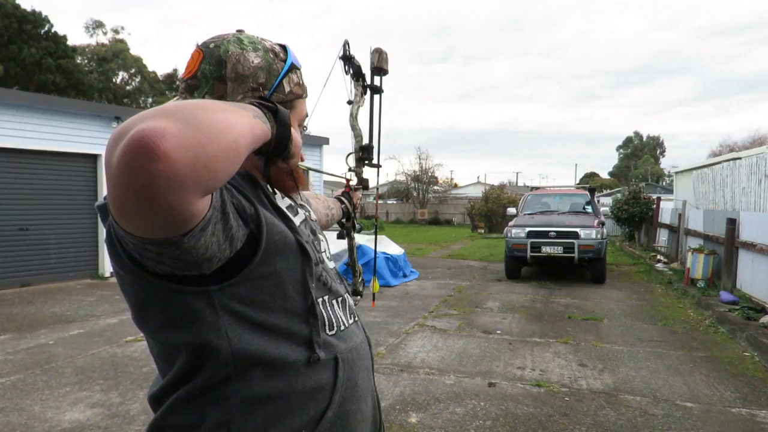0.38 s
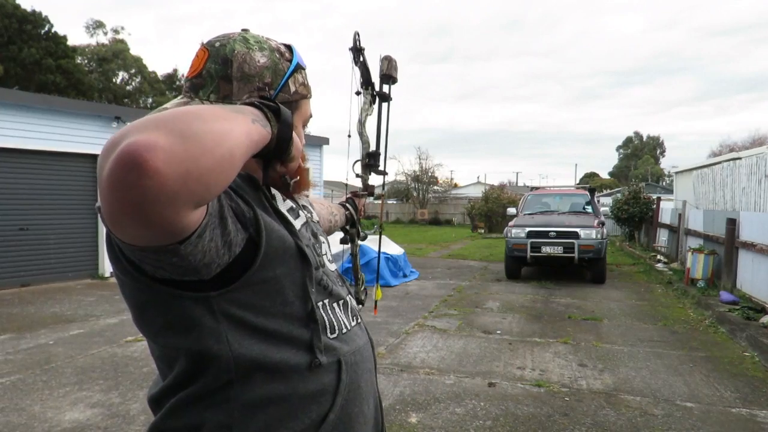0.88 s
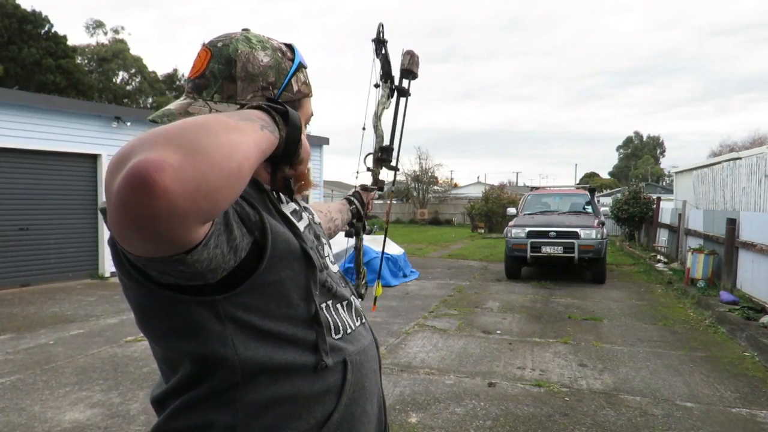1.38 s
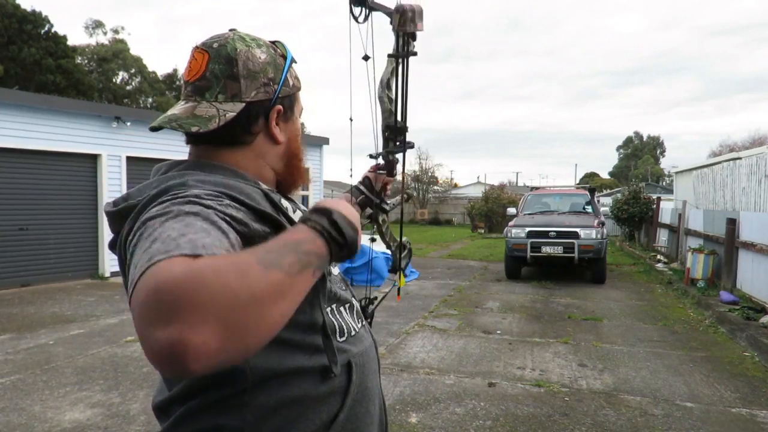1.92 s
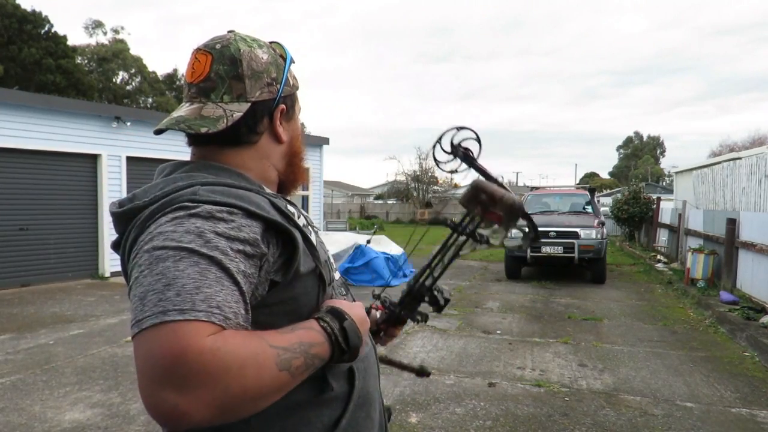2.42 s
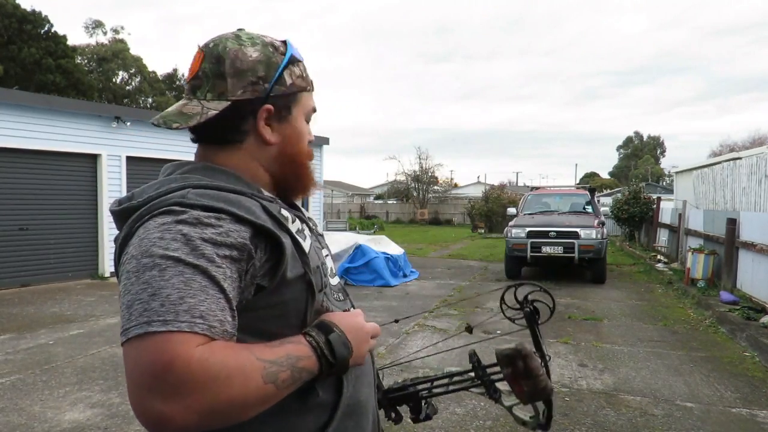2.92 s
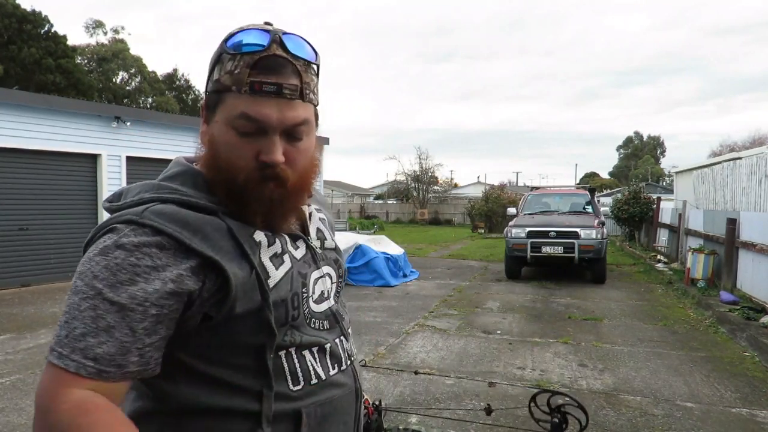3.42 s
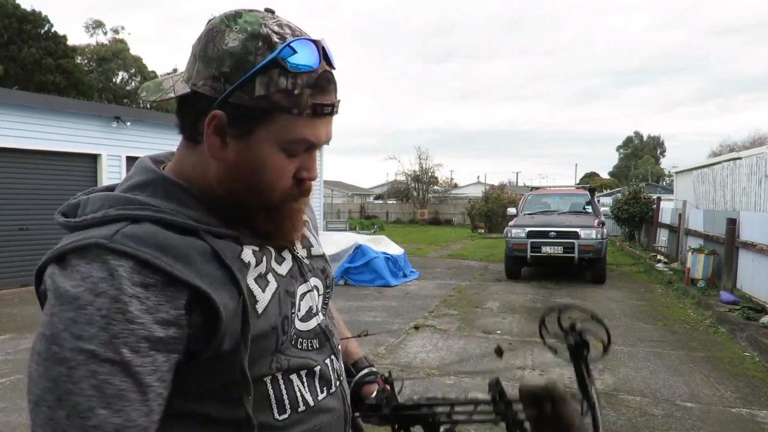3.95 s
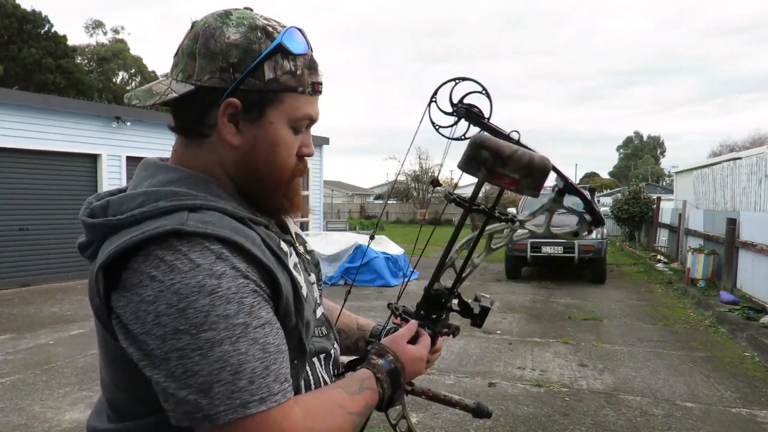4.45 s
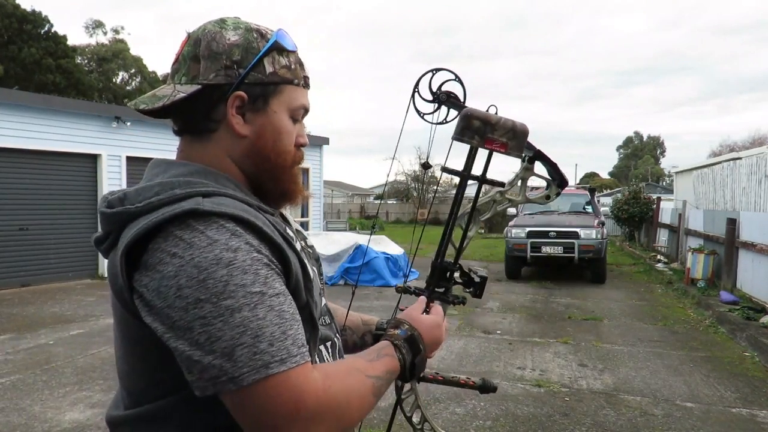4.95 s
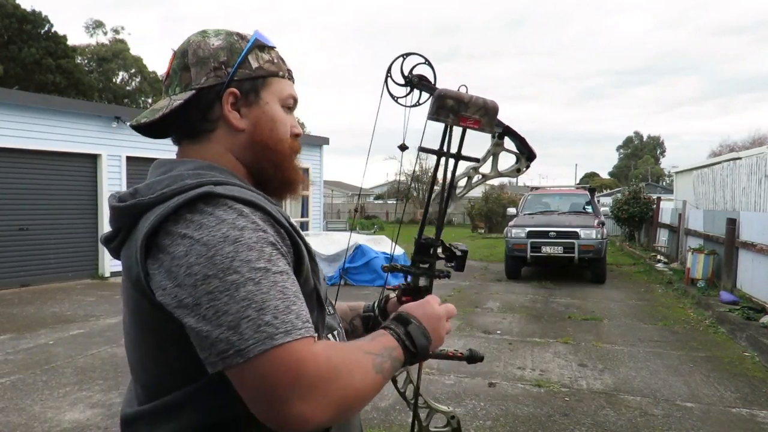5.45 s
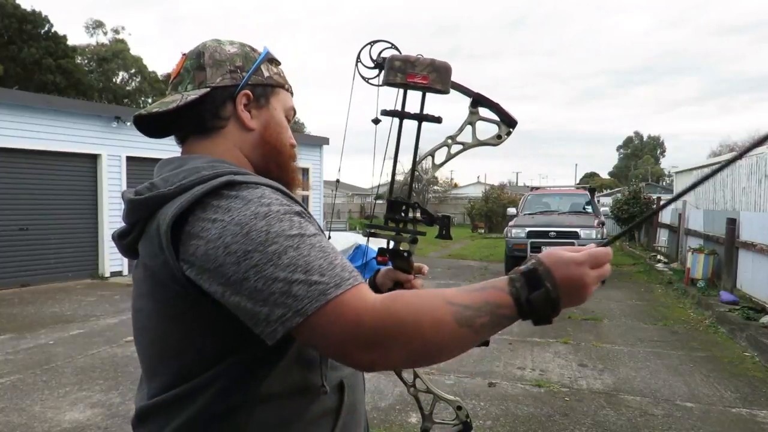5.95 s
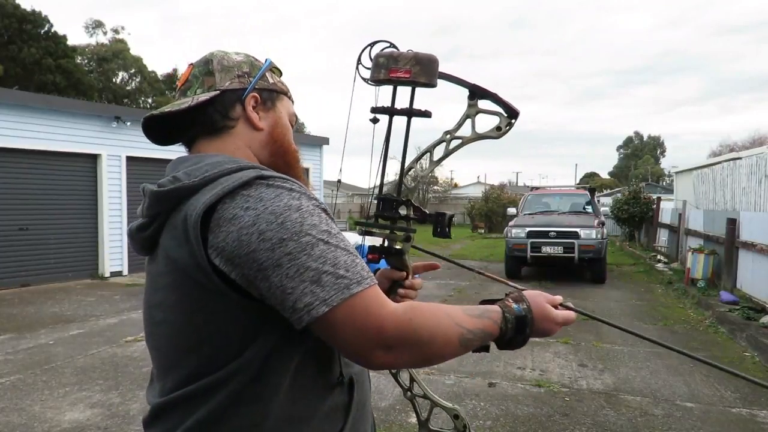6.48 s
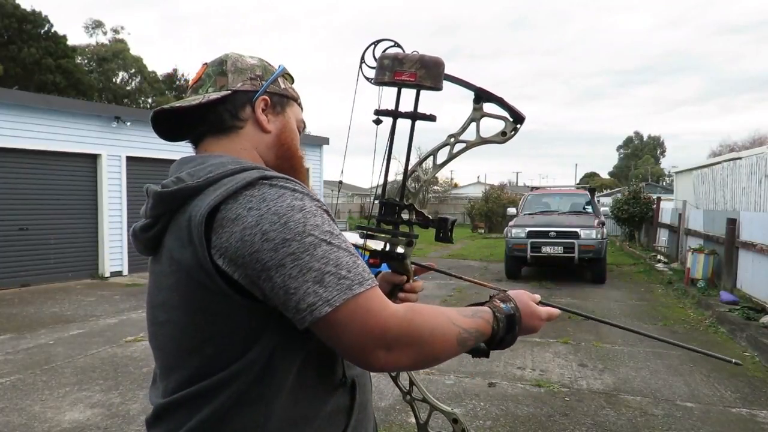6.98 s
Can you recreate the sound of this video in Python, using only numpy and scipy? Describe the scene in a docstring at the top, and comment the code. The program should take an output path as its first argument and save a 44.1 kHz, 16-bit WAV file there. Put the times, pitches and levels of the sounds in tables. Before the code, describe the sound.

Close up, a compound bow fires with a sharp clattering crack, the arrow thuds into a distant target, then light handling ticks over birds and traffic.

```python
"""A walled yard: close to a stereo recorder an arrow is loosed from a compound bow and thuds into a far target.
The archer handles the bow and snaps a new arrow out of the quiver; birds sing over distant traffic.
Blows are cracks, ringing modes and dying noise; hiss, rubs and traffic are shaped noise, birds gliding tones.
The walls scatter the sound back, and the recorder's gain control ducks after each loud blow."""
import sys
import numpy as np
from scipy import signal
from scipy.io import wavfile

SR = 44100
rng = np.random.default_rng(int(sys.argv[2]) if len(sys.argv) > 2 else 0)


def bounce(signal):
    """Save signal as a 16-bit WAV file at the path given by the first command-line argument."""
    frames = np.transpose(np.atleast_2d(signal))
    limited = np.clip(frames, -1, 1)
    pcm = np.round(limited * 32767).astype(np.int16)
    wavfile.write(sys.argv[1], SR, pcm)


def magnitude_from_level(level_db):
    """Linear magnitude for a level in decibels (20 dB per decade)."""
    exponent = np.asarray(level_db, float) / 20
    return 10 ** exponent


N = 313477   # length of the scene [samples]


def rms_one(x):
    """Scale to rms 1."""
    return x / np.sqrt(np.mean(x ** 2) + 1e-20)


def in_time(rows):
    """Columns of a curve over time, one value a sample."""
    s, *columns = np.transpose(rows)
    return [np.interp(np.arange(N) / SR, s, column) for column in columns]


def at_hz(points, hz):
    """Read a table over log frequency."""
    table_hz, values = np.transpose(points)
    return np.interp(np.log(hz), np.log(table_hz), values)


def drift(rate, size):
    """Slow random wander of spread 1, drawn every 40 samples; a higher rate wanders faster."""
    r = np.exp(-80 * np.pi * rate / SR)
    slow = signal.lfilter([1], [1, -2 * r, r * r], rng.standard_normal(size // 40 + 2002))
    settled = rms_one(slow)[2000:]
    return np.interp(np.arange(size) / 40, np.arange(len(settled)), settled)


def resonate(x, hz, width_hz):
    """A two-pole resonance of gain 1 on top."""
    r = np.exp(-np.pi * width_hz / SR)
    return signal.lfilter([(1 - r * r) / 2, 0, (r * r - 1) / 2],
                          [1, -2 * r * np.cos(2 * np.pi * hz / SR), r * r], x)


def add(out, x, s):
    """Mix x in from second s on."""
    at = round(s * SR)
    out[..., at:at + x.shape[-1]] += x[..., :N - at]


def span(from_s, to_s, edge_s):
    """1 between two moments, with soft edges."""
    t = np.arange(N) / SR
    return np.clip(np.minimum(t - from_s, to_s - t) / edge_s, 0, 1)


def bands(spectrum, likeness, size):
    """Half-octave bands of stereo noise: (centre Hz, sound), all together of rms about 1."""
    edges = 22 * 2 ** np.arange(0, 9.6, .5)
    centres = np.sqrt(edges[1:] * edges[:-1])
    gains = magnitude_from_level(at_hz(spectrum, centres))
    gains = gains / np.sqrt(np.sum(gains ** 2 * np.diff(edges)) * 4 / SR)
    white = rng.standard_normal((2, 2, size + 4000))   # neighbouring bands use different noise
    for k, hz in enumerate(centres):
        sos = signal.butter(2, edges[k:k + 2], "band", fs=SR, output="sos")
        mid, side = signal.sosfilt(sos, white[k % 2])[:, 4000:]
        alike = np.clip(at_hz(likeness, hz), -1, 1)
        stereo = np.sqrt(1 + alike) * mid + np.sqrt(1 - alike) * side * [[1], [-1]]
        yield hz, gains[k] * stereo


def glide(s, length_s, from_hz, to_hz, level_db, blur_hz, bend=1):
    """One gliding tone whose strength and phase waver, a little differently at each ear."""
    out, size = np.zeros((2, N)), int(length_s * SR)
    # a bend above 1 glides fast at first and levels off
    pitch_hz = to_hz * (from_hz / to_hz) ** np.linspace(1, 0, size) ** bend
    phase = 2 * np.pi * np.cumsum(pitch_hz) / SR
    paths = [drift(blur_hz, size) + 1j * drift(blur_hz, size) for _ in range(2)]
    paths = .3 + paths[0] + .5 * paths[1] * np.array([[1], [-1]])
    tone = np.real(paths * np.exp(1j * phase))
    add(out, magnitude_from_level(level_db) * signal.windows.tukey(size, .4) * tone, s)
    return out


def struck(jolts, modes, tail, tail_db, decay, rise_s):
    """Each jolt cracks and sets the modes ringing; dense small rattle and yard scatter die band by band."""
    # stereo image of the near blows: (frequency [Hz], left-right likeness [-1 to 1])
    near_likeness = [(60, 1), (240, 1), (950, 0.99), (3770, 0.86), (15000, 0.98)]
    # late scatter off walls and fence, against the first tail
    echo_db, echo_t60_s, dull_above_hz = -23, 1, 5000
    out, start, size = np.zeros((2, N)), jolts[0][0], int(.6 * SR)
    t = np.arange(size) / SR
    hz, mode_db, t60 = np.transpose(modes)[:, :, None]
    signs = (-1) ** np.arange(len(hz))[:, None]
    for s, ring_db, crack_db, crack_hz in jolts:
        strength = signs * magnitude_from_level(ring_db + mode_db + rng.normal(0, 1.6, hz.shape))
        ringing = strength * magnitude_from_level(-60 * t / t60) * np.sin(2 * np.pi * hz * t)
        add(out, np.sum(ringing, axis=0), s)
        impact = np.exp(-t / .00008) * (1 + 0.25 * rng.standard_normal(size))
        crack = resonate(impact, crack_hz, 0.54 * crack_hz)
        crack = resonate(crack, crack_hz, 1.2 * crack_hz)
        add(out, magnitude_from_level(crack_db) * crack / np.max(np.abs(crack)), s)
    late = magnitude_from_level(echo_db - 60 * t / echo_t60_s) * (1 - np.exp(-t / 0.033))
    fade_out = np.hanning(2 * size)[size:] ** .5
    for centre, noise in bands(tail, near_likeness, size):
        early = (1 - np.exp(-t / rise_s)) * magnitude_from_level(-60 * t / at_hz(decay, centre))
        scatter = late / (1 + (centre / dull_above_hz) ** 2)
        add(out, noise * magnitude_from_level(tail_db) * (early + scatter) * fade_out, start)
    rumble_cut = signal.butter(3, 95, "high", fs=SR, output="sos")
    return signal.sosfilt(rumble_cut, out + 1e-18)


def bow_jolt():
    """The stopping string jolts the bow: limbs and riser ring as damped modes over a noisy rattle."""
    # jolts as the string stops: (time [s], ring level [dB], crack peak [dB], crack centre [Hz])
    jolts = [(.6614, -30, -4.5, 4006), (.6632, -18, -17.5, 1525), (.6652, -10.5, -7, 1800),
             (.673, -11, -6.5, 2500), (.6765, -18.5, -10, 4020), (.685, -21, -10.5, 3000),
             (.6932, -22, -11, 2505)]
    # limbs and riser: (frequency [Hz], level [dB], time to fade 60 dB [s])
    modes = [(204, -1.5, 0.13), (250.4, -4.5, 0.015), (340, -13.5, 0.17), (441, -8.5, 0.08),
             (489, -8.5, 0.2), (693, -4, 0.2), (838, -6, 0.11), (952, -10, .12), (1060, -5.5, 0.17),
             (1111, -12.5, 0.14), (1172, -9, .13), (1281, -14.5, 0.077), (1323, -11, .12),
             (1558, -8, 0.085)]
    # colour of the rattle: (frequency [Hz], relative level [dB per Hz])
    tail = [(41, -50), (90, -18.5), (160, -28.5), (275, -15), (494, -2.5), (757, -15.5), (809, -23),
            (1060, -5), (1740, -15.5), (11700, -16.5), (14000, -21.5), (15000, -58)]
    # dying of the rattle: (frequency [Hz], time to fade 60 dB [s])
    decay = [(60, 0.15), (160, 0.61), (420, 0.45), (1100, 0.36), (2910, 0.3), (7680, 0.13)]
    return struck(jolts, modes, tail, -13.5, decay, rise_s=0.00092)


def string_and_cams():
    """The release clicks, the string whistles up to speed, the cams slam home; the long bow spreads a little."""
    # broad air and cam noises:
    # (time of the top [s], level [dB], swell [s], time to fade 60 dB [s], centre [Hz])
    broad_rows = [(0.6398, -20.5, .0004, 0.08, 796), (.6386, -32, 0.00036, .2, 10000),
                  (0.645, -26, 0.0028, 0.058, 2600), (0.659, -21.5, 0.01, 0.045, 8000),
                  (0.6611, -7, 0.002, 0.012, 3260), (.696, -29, .012, .03, 8000),
                  (.734, -44, .002, 0.033, 11000)]
    # string whistling through the air: (time of the top [s], level [dB], swell [s], centre [Hz])
    string_rows = [(0.6577, -12, 0.0055, 10200), (0.6732, -18, .002, 9890)]
    whistle_width_hz, whistle_t60_s = 1200, 0.016
    spread_full_hz = 26000   # the higher a noise, the wider it spreads
    out, t = np.zeros((2, N)), np.arange(-.05, .1, 1 / SR)
    broad = [(*row, 640 + 0.92 * row[-1]) for row in broad_rows]   # width grows with the centre
    narrow = [(s, db, swell_s, whistle_t60_s, hz, whistle_width_hz) for s, db, swell_s, hz in string_rows]
    for s, level_db, swell_s, t60, hz, width_hz in broad + narrow:
        noise = resonate(rng.standard_normal((2, len(t))), hz, width_hz)
        mid, side = rms_one(resonate(noise, hz, width_hz))
        shape = np.where(t < 0, np.exp(-(t / swell_s) ** 2), magnitude_from_level(-60 * np.abs(t) / t60))
        stereo = mid + hz / spread_full_hz * side * [[1], [-1]]
        add(out, magnitude_from_level(level_db) * shape * stereo, s + t[0])
    return out


def trailing_hiss():
    """A faint broad hiss trails after the shot and stops: resonant noise under a steady fade in dB."""
    start_s, end_s, start_db, fade_db_per_s = .7, .92, -45.5, 44
    level_db = start_db - fade_db_per_s * np.maximum(np.arange(N) / SR - start_s, 0)
    hiss = rms_one(resonate(rng.standard_normal((2, N)), 4000, 5080))
    return span(start_s, end_s, edge_s=.02) * magnitude_from_level(level_db) * hiss


def target_hit():
    """The arrow thuds into the far target: damped modes ring under a noisy tail, with wall echoes after."""
    # impact and wall echoes: (time [s], ring level [dB], crack peak [dB], crack centre [Hz])
    jolts = [(1.2041, -18, -4.5, 2800), (1.2063, -17.5, -5, 2130), (1.2115, -21.5, -9, 3130),
             (1.242, -31, -25, 2000), (1.265, -45, -17, 1590), (1.287, -38, -48, 800)]
    # body of the target: (frequency [Hz], level [dB], time to fade 60 dB [s])
    modes = [(118, -15.5, 1), (193, -11.5, 0.7), (233, -14, 0.41), (330, -11, 0.082), (374.3, 3, 0.15),
             (797, -4, 0.061), (2310, -3, 0.035)]
    # colour of the thud's noise: (frequency [Hz], relative level [dB per Hz])
    tail = [(35, -34), (60, -8), (105, -3.5), (155, -10.5), (220, -2.5), (355, 1.5), (448, -8.5),
            (816, -14.5), (1100, -16), (1490, -19.5), (2420, -19.5), (3600, -29.5), (6090, -41),
            (13100, -33), (15000, -84)]
    # dying of that noise: (frequency [Hz], time to fade 60 dB [s])
    decay = [(60, 0.72), (160, 0.63), (420, 0.21), (1100, 0.24), (2910, 0.48), (7680, 0.12)]
    return struck(jolts, modes, tail, -15.5, decay, rise_s=0.00048)


def shaft_snap():
    """The shaft springs out of the quiver clip and rings as short high modes over a bright rattle."""
    jolts = [(5.956, -23, -4.5, 2000), (5.958, -11.5, -11, 6420), (5.961, -27.5, -5, 4180),
             (5.968, -41, -9, 2500)]
    # ringing shaft: (frequency [Hz], level [dB], time to fade 60 dB [s])
    modes = [(1643, -1.5, 0.032), (2270, -4.5, 0.074), (2800, -14, 0.092), (3333, -4.5, 0.13),
             (3380, -15, .1), (4760, -9, 0.053), (5735, 0, 0.038), (5710, -19, 0.17), (7230, -13, .06),
             (8200, -12, .05)]
    # colour of the rattle: (frequency [Hz], relative level [dB per Hz])
    tail = [(150, -46), (250, -18), (500, -16), (823, -4.5), (1330, -5), (2280, -8), (3060, 6),
            (3330, -7.5), (3570, -9), (12000, -12.5), (14500, -13), (15500, -47)]
    # dying of the rattle: (frequency [Hz], time to fade 60 dB [s])
    decay = [(300, 0.18), (790, 0.077), (2090, 0.12), (5510, 0.14), (12000, 0.087)]
    return struck(jolts, modes, tail, -16.5, decay, rise_s=0.0005)


def ticks():
    """Each handling tick is a sharp touch and a short puff through one broad ring, with an edge and air on top."""
    # (time [s], level [dB], ring [Hz], edge against the ring [dB], air against the ring [dB])
    tick_rows = [(4.427, -42, 800, -14, -34), (4.433, -41, 1250, -12, -34), (4.579, -42, 1150, -2, -22),
                 (4.778, -40, 1100, -7, -15), (4.929, -43, 970, -8, -14), (4.992, -45, 900, -8, -22),
                 (5.001, -45, 1500, -8, -22), (5.019, -44, 800, -9, -24), (5.24, -52, 850, -15, -30),
                 (5.447, -53, 1300, -12, -26), (5.463, -47, 2250, -8, -24), (5.47, -47, 2400, -5, -24),
                 (5.484, -37, 1700, -14, -27), (5.5, -42, 1780, -10, -24), (5.52, -50, 1600, -6, -20),
                 (5.547, -44, 1060, -12, -22), (5.611, -54, 1450, -2, -1), (6.048, -27.5, 1900, -3, -19),
                 (6.058, -37, 2200, -2, -6), (6.07, -43, 2200, -2, -5), (6.085, -50, 2200, -2, -8),
                 (6.587, -48, 830, -17, -31), (6.656, -49, 850, -5, -14), (6.791, -50, 640, -8, -14)]
    t60_s, touch_s = 0.077, 0.0018
    knock_hz, knock_db = 480, -6   # the bow's body answers every tick
    out, t = np.zeros(N), np.arange(int(.15 * SR)) / SR
    edge_band = signal.butter(3, [2200, 5200], "band", fs=SR, output="sos")
    air_band = signal.butter(2, [5200, 14000], "band", fs=SR, output="sos")
    shape = magnitude_from_level(-60 * t / t60_s) * (1 + 1.2 * np.exp(-t / touch_s))
    for s, level_db, hz, edge_db, air_db in tick_rows:
        body, knock, edge, air = shape * rng.standard_normal((4, len(t)))
        knock = resonate(resonate(knock, knock_hz, 670), knock_hz, 970)
        knock = magnitude_from_level(knock_db) * rms_one(knock)
        body = rms_one(resonate(resonate(body, hz, 0.29 * hz), hz, 0.82 * hz))
        edge = magnitude_from_level(edge_db) * rms_one(signal.sosfilt(edge_band, edge))
        air = magnitude_from_level(air_db) * rms_one(signal.sosfilt(air_band, air))
        add(out, magnitude_from_level(level_db) * np.sqrt(np.mean(shape ** 2)) * (body + knock + edge + air), s)
    return out


def slide():
    """The shaft slides out of its gripper with a falling squeak that fades steadily in dB."""
    start_s, fade_db_per_s = 5.49, 32
    fade = magnitude_from_level(-fade_db_per_s * np.abs(np.arange(N) / SR - start_s))
    return fade * glide(start_s, .25, from_hz=1780, to_hz=1290, level_db=-53.5, blur_hz=20, bend=1.7)


def rubs():
    """Grainy friction of fingers and shaft: each stroke swells and fades as bright hiss and a catching middle."""
    # strokes in the quiver: (time of the top [s], hiss level [dB], middle level [dB],
    # time to swell 20 dB [s], time to fade 20 dB [s])
    strokes = [(4.929, -51, -48, .018, .095), (4.997, -57, -47, .045, .055), (5.136, -59.5, -72, .14, .24),
               (5.463, -66, -47, .05, .08), (5.487, -55, -47, .035, .085), (5.561, -57.5, -56, .085, .095),
               (5.851, -69, -66, .11, .11), (5.95, -60, -62, .03, .02), (6.03, -57, -66, .06, .1)]
    middle_hz, middle_width_hz = 1750, 1400
    grain = rng.standard_normal((3, N))
    hiss_band = signal.butter(3, [5500, 14000], "band", fs=SR, output="sos")
    hiss = signal.sosfilt(hiss_band, grain[:2])
    hiss = rms_one(hiss[0] + 0.78 * hiss[1] * [[1], [-1]])
    catching = grain[2] * magnitude_from_level(4 * drift(90, N))
    middle = rms_one(resonate(catching, middle_hz, middle_width_hz))
    out = np.zeros((2, N))
    for s, hiss_db, middle_db, swell_s, fade_s in strokes:
        t = np.arange(N) / SR - s
        stroke = magnitude_from_level(-20 * np.abs(t) / np.where(t < 0, swell_s, fade_s))
        out = out + stroke * (magnitude_from_level(hiss_db) * hiss + magnitude_from_level(middle_db) * middle)
    return out


def foot():
    """A foot shifts: a low soft push through the ground."""
    top_s, level_db, centre_hz = 1.9, -47.5, 60
    t = np.arange(N) / SR - top_s
    rumble = rms_one(resonate(rng.standard_normal(N), centre_hz, 81))
    return magnitude_from_level(level_db) * rumble * np.exp(-(t / 0.062) ** 2)


def walls(x, wet_db):
    """Scattered returns off walls and fence, other ones at each ear; the treble is soaked up sooner."""
    t60_s, treble_t60_s, treble_hz = .42, .16, 4500
    t = np.arange(int(.5 * SR)) / SR
    white = rng.standard_normal((2, len(t)))
    low = signal.sosfilt(signal.butter(2, treble_hz, fs=SR, output="sos"), white)
    high = signal.sosfilt(signal.butter(2, treble_hz, "high", fs=SR, output="sos"), white)
    returns = low * magnitude_from_level(-60 * t / t60_s) + high * magnitude_from_level(-60 * t / treble_t60_s)
    returns = returns * (t > .004)   # the first return comes after 4 ms
    returns = returns / np.sqrt(np.sum(returns ** 2, axis=1, keepdims=True))
    return x + magnitude_from_level(wet_db) * signal.fftconvolve(x * np.ones((2, 1)), returns, axes=1)[:, :N]


def birds():
    """Whistles, chirps and warbles as gliding tones, blurred by the many paths over the roofs."""
    # clear level whistles: (start [s], length [s], pitch [Hz], level [dB])
    whistle_rows = [(2.44, 0.12, 2245, -63), (2.993, 0.21, 3690, -60.5), (3.17, 0.19, 3680, -66),
                    (3.33, 0.13, 8200, -73), (3.646, .08, 3660, -60), (3.76, .11, 3600, -70),
                    (6.955, 0.095, 8230, -69.5)]
    # quick gliding chirps: (start [s], length [s], from [Hz], to [Hz], level [dB])
    chirp_rows = [(2.597, 0.096, 5900, 3000, -62), (3.306, 0.043, 4080, 4620, -62),
                  (3.347, .066, 4150, 4170, -61), (3.384, 0.058, 3690, 3530, -56),
                  (3.672, 0.033, 4500, 4420, -60), (3.693, 0.025, 4520, 4000, -60),
                  (3.742, .025, 5650, 5530, -68), (3.758, .03, 5300, 5150, -66),
                  (3.78, 0.029, 4900, 3950, -58), (3.915, .1, 5280, 3040, -56)]
    # far warbled notes: (start [s], length [s], starting pitch [Hz], level [dB])
    warble_rows = [(2.696, 0.12, 2570, -55.5), (2.846, 0.11, 2820, -52.5), (2.893, 0.13, 2540, -59),
                   (2.929, 0.12, 2800, -53), (3.034, 0.16, 2760, -61.5), (3.249, 0.065, 2610, -56),
                   (3.32, 0.067, 1440, -52.5), (3.42, 0.067, 1440, -55.5), (3.322, 0.21, 2450, -58.5),
                   (3.563, 0.11, 2920, -57), (3.687, 0.105, 2960, -58), (3.786, 0.107, 2900, -56.5),
                   (4.0, 0.11, 3140, -58.5), (5.544, 0.046, 2800, -53), (5.618, 0.043, 2950, -58),
                   (5.314, 0.052, 3190, -57)]
    out = np.zeros((2, N))
    for s, length_s, hz, level_db in whistle_rows:
        out += glide(s, length_s, hz, hz, level_db, blur_hz=25.2)
    for row in chirp_rows:
        out += glide(*row, blur_hz=80, bend=1.8)
    for s, length_s, hz, level_db in warble_rows:
        out += glide(s, length_s, hz, 0.99 * hz, level_db, blur_hz=160)   # the note sags a little
    return out


def traffic():
    """Distant traffic: a roar of noise that wavers band by band, over a low wandering engine drone."""
    # (time [s], roar level [dB], engine drone pitch [Hz], drone level [dB])
    course = [(0, -47.5, 52, -71), (.6, -46, 53, -61.5), (1.6, -45.5, 51, -58.5), (2.5, -47, 50.8, -56),
              (3.5, -45.5, 55.74, -57.5), (4.4, -43, 56.97, -60), (5.3, -47, 60, -64),
              (5.6, -45.5, 60, -65.5), (7.11, -44, 58.85, -67)]
    # colour of the roar: (frequency [Hz], relative level [dB per Hz])
    colour = [(22, -18), (40, -10), (64, -11.5), (85, -16.5), (120, 0.5), (160, -7), (200, -2.5),
              (330, -2.5), (724, -7), (1010, -9), (1830, -18), (3340, -19.5), (5600, -32.5), (8000, -36),
              (11400, -40), (15000, -58)]
    # stereo image of the roar: (frequency [Hz], left-right likeness [-1 to 1])
    likeness = [(30, 1), (60, 0.85), (130, 0.93), (290, -0.3), (640, 0.33), (1410, 0.042), (3100, 0.56),
                (6820, 1), (15000, 0.12)]
    roar_db, drone_hz, drone_db = in_time(course)
    together = drift(1.5, N)
    roar = sum(noise * magnitude_from_level(.4 * together + drift(6, N)) for _, noise in bands(colour, likeness, N))
    drone = np.sin(2 * np.pi * np.cumsum(drone_hz + 1.5 * drift(3, N)) / SR)
    drone = drone * np.sqrt(2) * magnitude_from_level(drone_db + 3 * drift(5, N))
    return magnitude_from_level(roar_db) * roar + drone


def whine():
    """A thin far tone comes and goes, wavering in pitch and strength."""
    tone = np.sin(2 * np.pi * np.cumsum(991 + 3 * drift(3.7, N)) / SR)
    strength = np.sqrt(2) * magnitude_from_level(-61.5 + 1.9 * drift(4.5, N))
    return span(2, 3.5, edge_s=0.11) * strength * tone


def scene():
    """All sources, left and right; walls answer the near blows faintly and the birds strongly."""
    blows = bow_jolt() + string_and_cams() + target_hit() + shaft_snap() + ticks()
    near = walls(blows, wet_db=-21.5) + trailing_hiss() + slide() + rubs() + foot()
    far = walls(birds(), wet_db=-4) + traffic() + whine()
    return near + far


def roll_off(x):
    """The treble ends steeply here."""
    return signal.sosfilt(signal.butter(12, 15950, fs=SR, output="sos"), x)


def record(dry):
    """Gain control follows the smoothed power and lets go slowly; peaks are rounded and the top treble cut."""
    duck_above_db, duck_share, release_db_per_s = -25.5, 0.85, 8.5
    input_db, peak_top = -0.92, 0.68
    r = np.exp(-1 / (.08 * SR))
    power = signal.lfilter([1 - r], [1, -r], np.mean(dry ** 2, axis=0))
    level_db = 10 * np.log10(power + 1e-12)
    duck_db = duck_share * np.maximum(level_db - duck_above_db, 0)
    # the ducking may fall no faster than the release
    release_db = release_db_per_s * np.arange(N) / SR
    duck_db = np.maximum(np.maximum.accumulate(duck_db + release_db) - release_db, 0)
    r = np.exp(-1 / (.1 * SR))
    duck_db = signal.lfilter([1 - r], [1, -r], duck_db)
    rounded = peak_top * np.tanh(dry * magnitude_from_level(input_db - duck_db) / peak_top)
    top_cut = signal.cheby2(6, 30, 15800, fs=SR, output="sos")
    return roll_off(signal.sosfilt(top_cut, rounded))


dry = scene()
out = record(dry)
bounce(out)
```